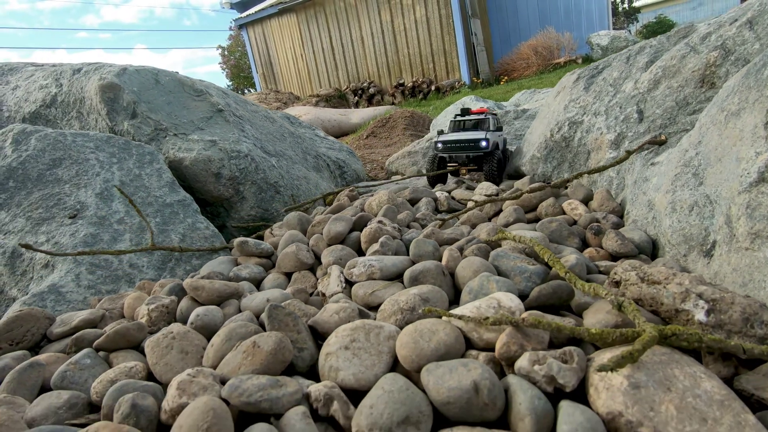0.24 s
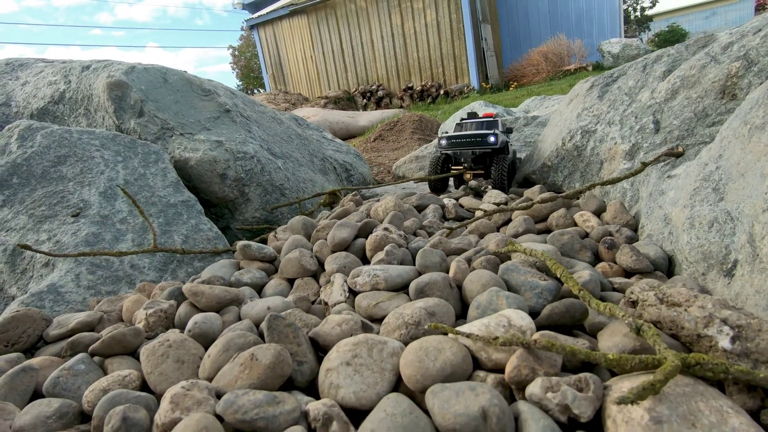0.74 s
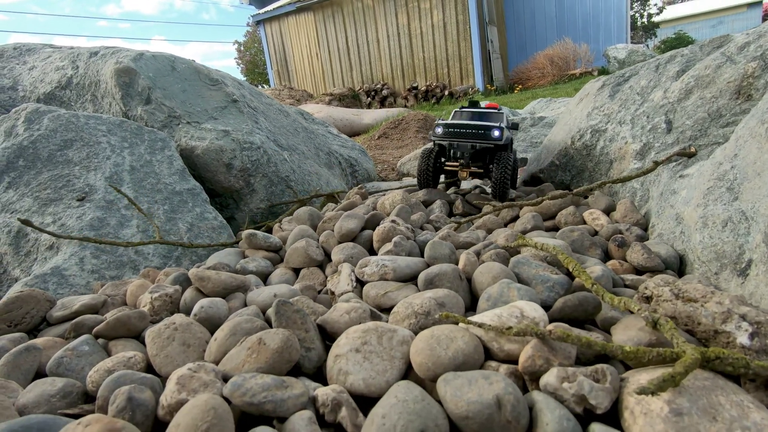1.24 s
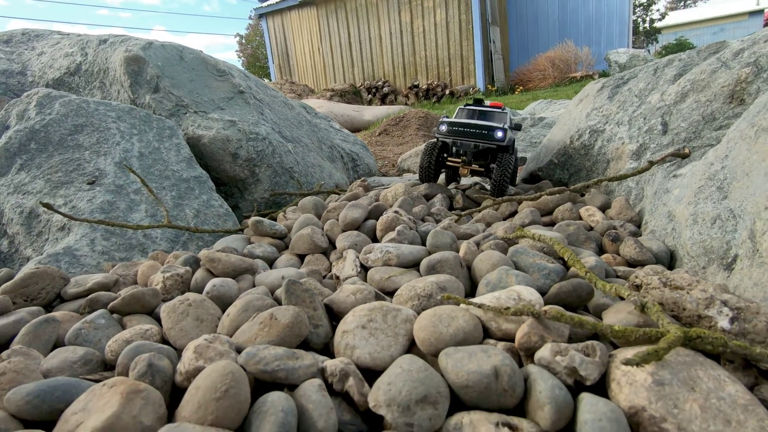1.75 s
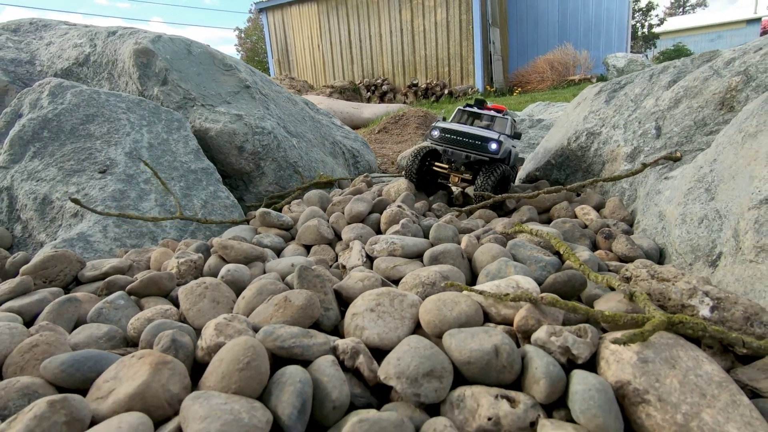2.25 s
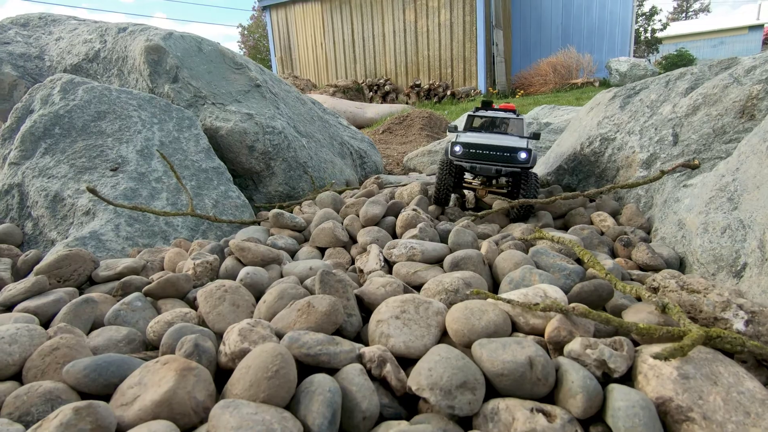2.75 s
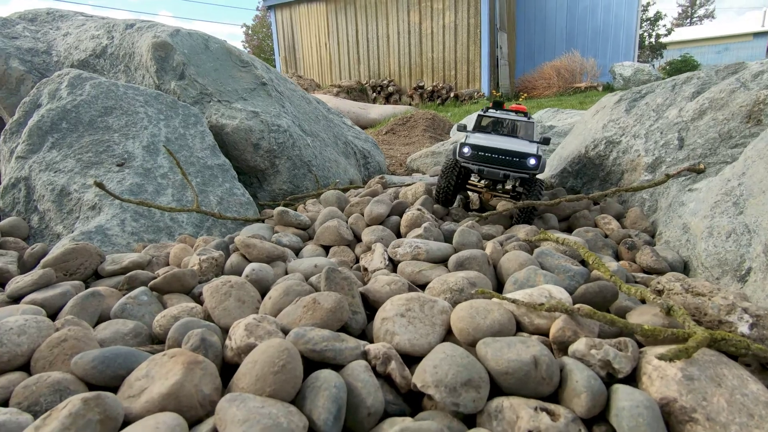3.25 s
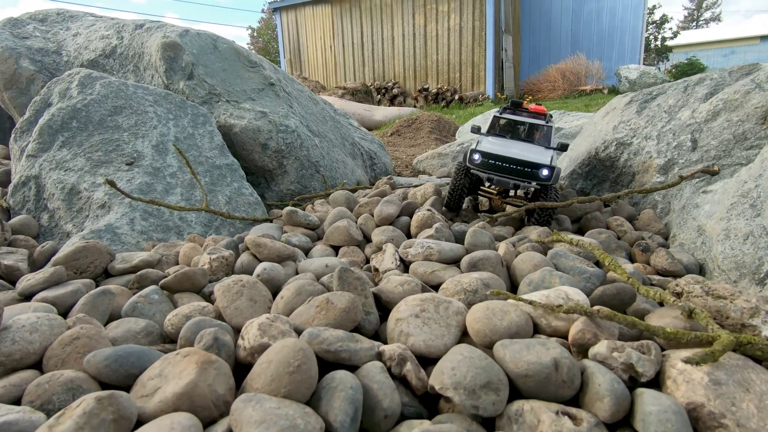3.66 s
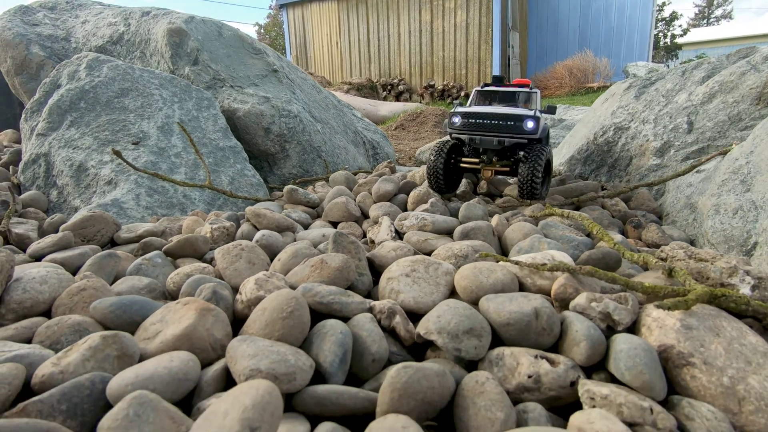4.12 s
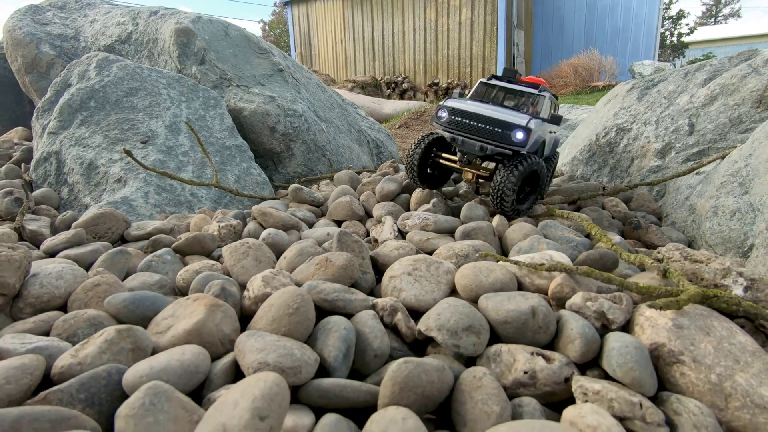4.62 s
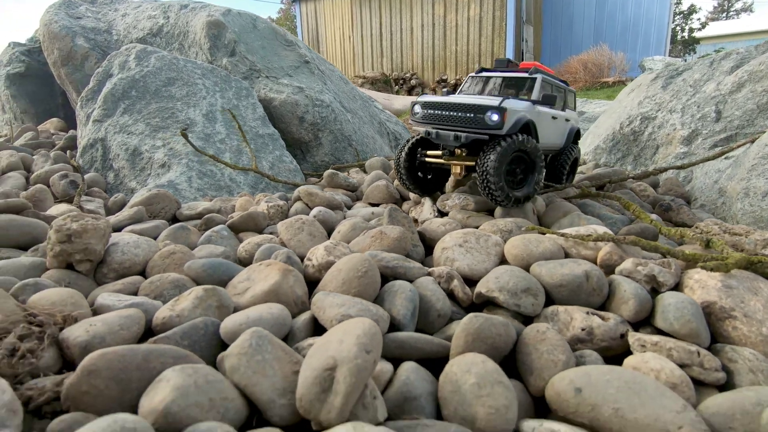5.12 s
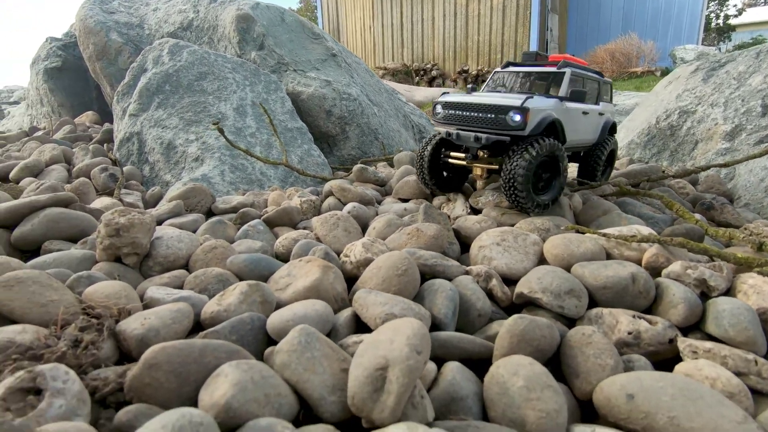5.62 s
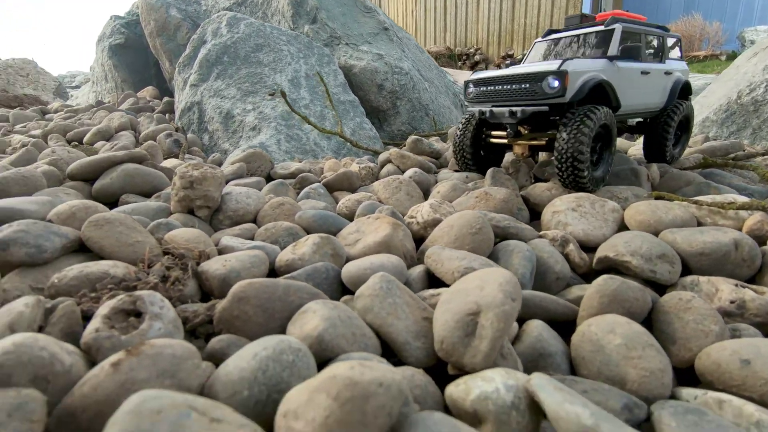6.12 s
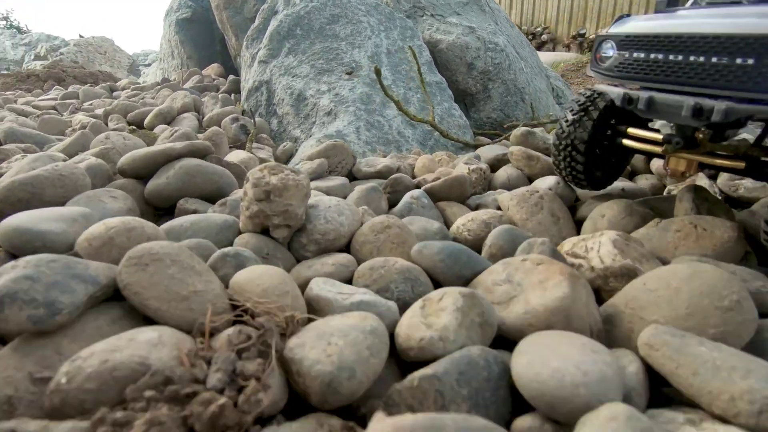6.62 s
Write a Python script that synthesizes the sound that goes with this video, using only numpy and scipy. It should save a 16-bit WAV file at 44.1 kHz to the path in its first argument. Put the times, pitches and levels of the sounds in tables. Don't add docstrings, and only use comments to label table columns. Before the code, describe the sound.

A thin, buzzy motor whir rises and falls with gaps between pulls, over gritty cracks and stony ticks. Wind flutters low across a small stereo microphone near the ground. A dense cluster of hollow case knocks, pebble clacks, dull thuds and faint steering chirps fills the middle. Afterwards the stereo image narrows and the little vehicle revs, pauses and creeps past over the stones.

```python
import sys
import numpy as np
from scipy import signal
from scipy.fft import rfft, irfft
from scipy.io import wavfile
from scipy.ndimage import uniform_filter1d

SR = 44100
rng = np.random.default_rng(int(sys.argv[2]) if len(sys.argv) > 2 else 0)


def generate_wav(sig):
    pcm = np.round(np.clip(np.atleast_2d(sig).T, -1, 1) * 32767).astype(np.int16)
    wavfile.write(sys.argv[1], SR, pcm)


def attenuation_scalar(level_db):
    decades = np.asarray(level_db, float) / 20
    return 10 ** decades


N = 303760


def rms_one(x):
    return x / np.sqrt(np.mean(x ** 2) + 1e-20)


def in_time(rows):
    s, *columns = np.transpose(rows)
    return [np.interp(np.arange(N) / SR, s, c) for c in columns]


def gate(start, end, fade_s):
    return np.interp(np.arange(N) / SR, [start - fade_s, start, end, end + fade_s], [0, 1, 1, 0])


def drift(rate_hz):
    r = np.exp(-32 * np.pi * rate_hz / SR)
    slow = signal.lfilter([1], [1, -2 * r, r * r], rng.standard_normal(N // 16 + 1002))[1000:]
    return np.interp(np.arange(N) / 16, np.arange(len(slow)), rms_one(slow))


def band(x, low_hz, high_hz):
    return signal.sosfilt(signal.butter(2, [low_hz, high_hz], "band", fs=SR, output="sos"), x)


def ring(clicks, hz, t60):
    r, w = attenuation_scalar(-60 / (t60 * SR)), 2 * np.pi * hz / SR
    return signal.lfilter([0, np.sin(w)], [1, -2 * r * np.cos(w), r * r], clicks)


def coloured(x, spectrum):
    hz, db = np.transpose(spectrum)
    bin_hz = np.arange(N // 2 + 1) * SR / N
    gain_db = np.interp(np.log(bin_hz + 1), np.log(hz), db)
    return rms_one(irfft(rfft(x) * attenuation_scalar(gain_db), N))


def patchy(x, edges_hz, own_db):
    return sum(attenuation_scalar(own_db * drift(30)) * band(x, low, high) for low, high in zip(edges_hz, edges_hz[1:]))


def grains(per_s, spread_db):
    level = attenuation_scalar(spread_db * np.minimum(rng.exponential(1, N), 4))
    return (rng.random(N) < per_s / SR) * level * rng.choice([-1, 1], N)


def add(out, s, sound):
    i = round(s * SR)
    out[..., i:i + sound.shape[-1]] += sound[..., :N - i]


def shell(x):
    # f/Hz, width/Hz, level/dB
    body_modes = [(900, 350, 4), (1700, 480, 1), (2426, 444, 10), (3400, 360, 4), (4590, 93, -2),
                  (5620, 150, -6.5), (6500, 82, -7), (7100, 900, -12), (10070, 190, -26)]
    out = 0
    for k, (hz, width, db) in enumerate(body_modes):
        r = np.exp(-np.pi * width / SR)
        zeros = np.array([1, 0, -1]) * (1 - r * r) / 2
        poles = [1, -2 * r * np.cos(2 * np.pi * hz / SR), r * r]
        out = out + (-1) ** k * attenuation_scalar(db) * signal.lfilter(zeros, poles, x)
    return out


def air():
    # peak t/s, level/dB, half length/s
    gust_peaks = [(0.122, -44, 0.32), (0.587, -44, 0.14), (1.022, -37.5, 0.13), (2.128, -36.5, 0.092),
                  (2.307, -36, 0.17), (2.844, -31, 0.11), (3.042, -36, 0.2), (3.387, -40.5, 0.24),
                  (3.811, -51.5, 0.23), (4.3, -51, 0.17), (4.776, -47, 0.19), (5.015, -41, 0.092),
                  (5.215, -33.5, 0.17), (5.819, -52.5, 0.31), (6.351, -60, 0.3)]
    # f/Hz, level/dB per Hz
    wind_colour = [(12, -24), (20, 1.5), (48, 0), (70, 4.5), (189, -15), (285, -27), (400, -22.5),
                   (520, -75)]
    # t/s, level/dB
    rumble_curve = [(0, -48), (0.6, -56), (1.05, -46), (1.55, -55), (2.8, -46.5), (3.3, -37), (3.7, -39.5),
                    (3.86, -47.5), (3.98, -40.5), (4.4, -46.5), (5.25, -43), (5.8, -43.5), (6.25, -43),
                    (6.44, -40), (6.89, -48)]
    # f/Hz, level/dB per Hz
    far_colour = [(150, -36), (250, -15.5), (722, 11.5), (1240, 3.5), (1730, -3), (2310, -24), (5930, -29),
                  (14000, -130)]
    # t/s, level/dB
    far_curve = [(0.0, -50), (0.4, -53.5), (3.65, -50.5), (3.7, -55.5), (6.31, -46.5), (6.89, -50)]
    calm_db = -51.5
    t = np.arange(N) / SR
    (rumble_db,), (far_db,) = in_time(rumble_curve), in_time(far_curve)

    gusts = attenuation_scalar(calm_db)
    for s, db, half_s in gust_peaks:
        gusts = gusts + attenuation_scalar(db) * np.clip(1 - np.abs(t - s) / half_s, 0, 1) ** 0.8
    wind = np.array([coloured(rng.standard_normal(N), wind_colour) * attenuation_scalar(2.0 * drift(14)) for row in range(2)])
    wind[1] += .3 * wind[0]
    wind = gusts * wind * attenuation_scalar([[0], [3]])

    rumble = band(band(rng.standard_normal(N), 130.0, 217.7), 69.0, 434)
    rumble = rms_one(rumble) * attenuation_scalar(2.5 * drift(7.8))
    rumble += attenuation_scalar(-7.5) * rms_one(band(grains(1500, spread_db=1.0), 210, 656))
    ground = attenuation_scalar(rumble_db - 4.0) * np.array([rumble, 0.28 * np.roll(rumble, SR)])

    far = np.array([coloured(rng.standard_normal(N), far_colour) for row in range(2)])
    return wind + ground + attenuation_scalar(far_db - 4.5) * far * attenuation_scalar([[0], [-.1]])


def throttle():
    # t/s, f/Hz
    mesh_far = [
        [(-0.1, 1140), (0.0, 1200), (0.06, 1290), (0.1, 1350), (0.13, 1547), (0.17, 1676), (0.23, 1570)],
        [(0.25, 1378), (0.33, 1210)],
        [(0.5, 846), (0.525, 1093), (0.55, 1265), (0.6, 1504), (0.65, 1758), (0.69, 1940), (0.72, 1654),
         (0.77, 1452), (0.785, 1238)],
        [(0.79, 1207), (0.805, 1090), (0.83, 1080), (0.88, 1118), (0.93, 1084), (0.97, 1176), (1.01, 1276)],
        [(1.035, 1590), (1.07, 1574), (1.11, 1800), (1.15, 1700), (1.18, 1595), (1.23, 1714), (1.29, 1660),
         (1.325, 1146), (1.36, 1222)],
        [(1.85, 839), (1.92, 900), (1.97, 1062), (2.01, 1122), (2.05, 1298), (2.12, 1241), (2.2, 1055)],
        [(2.36, 817), (2.5, 826), (2.55, 1058), (2.59, 768), (2.64, 795)],
        [(2.67, 845), (3.2, 817)],
        [(3.25, 840), (3.8, 814)],
    ]
    # t/s, f/Hz
    mesh_near = [
        [(3.95, 1053), (3.97, 1383), (3.99, 1700), (4.02, 1750), (4.07, 2090), (4.15, 1350), (4.18, 1000),
         (4.22, 835)],
        [(4.26, 674), (4.38, 700), (4.42, 895), (4.46, 870), (4.5, 810), (4.55, 825), (4.61, 883)],
        [(4.64, 1012), (4.72, 1381), (4.82, 1644), (4.85, 1540), (4.89, 1045)],
        [(4.92, 955), (4.95, 1080), (5.02, 1040), (5.06, 830), (5.12, 800), (5.2, 670)],
        [(5.27, 598.4), (5.56, 600)],
        [(5.64, 800), (5.7, 1000), (5.74, 1160), (5.81, 1240), (5.85, 1080), (5.9, 885)],
        [(6.17, 900), (6.22, 1355), (6.25, 1370), (6.28, 1750), (6.33, 1680), (6.36, 1420), (6.39, 1450),
         (6.41, 1648), (6.46, 1180), (6.5, 1054)],
        [(6.55, 800), (6.95, 820)],
    ]
    # whine level/dB, rasp level/dB, fizz level/dB, scrub level/dB
    loads = [(-56.5, -42, -47, -43.5), (-70, -46.5, -53.5, -49), (-63, -57, -60.5, -47),
             (-51.5, -50, -55, -51), (-57.5, -47.5, -57, -47), (-57.5, -51.5, -52, -45.5),
             (-53, -47, -54, -72), (-70, -49.5, -50.5, -53), (-86, -51, -65, -52), (-54, -50, -68.5, -48),
             (-50, -47, -76, -51), (-57.5, -46, -63, -47), (-55, -46.5, -62, -46), (-90, -87, -90, -51.5),
             (-57.5, -46.5, -60, -45), (-53, -50.5, -61.5, -44.5), (-89, -71, -60.5, -45.5)]
    rest_db = (-100, -73.5, -75, -63)
    db_per_octave = (8.6, 1.8, 13.6, 4.8)
    cruise_hz, spin_up_s, spin_down_s = 1200, 0.054, 0.058
    slide_s = .1

    surges = mesh_far + mesh_near
    hz, = in_time([row for rows in surges for row in rows])
    t = np.arange(N) / SR
    gains = attenuation_scalar(np.array(rest_db))[:, None] * np.ones(N)
    for rows, load_db in zip(surges, loads):
        start, end = rows[0][0], rows[-1][0]
        on = slice(max(round((start - spin_up_s) * SR), 0), round((end + spin_down_s) * SR))
        corners = [start - spin_up_s, start + spin_up_s, end - spin_down_s, end + spin_down_s]
        shape = np.interp(t[on], corners, [0, 1, 1, 0])
        speed_db = np.outer(db_per_octave, np.log2(hz[on] / cruise_hz))
        gains[:, on] += shape * attenuation_scalar(np.array(load_db)[:, None] + speed_db)
    gains[3] = uniform_filter1d(gains[3], round(slide_s * SR))
    return hz, gains


def whine(hz, gain, fizz_gain):
    # multiple of mesh, level/dB
    harmonics = [(1, 2.5), (2, 5), (3, 2.5), (4, -6), (5, -8), (6, -9), (7, -11), (8, -13)]
    teeth, throb = 12.5, .6
    jitter, wander, rough = .011, .008, .42
    flutter_db, sing_db = 2.0, -6
    phase = 2 * np.pi * np.cumsum(hz * (1 + jitter * drift(72.0) + wander * drift(18.45))) / SR
    worn = (1 + rough * drift(170)) * attenuation_scalar(flutter_db * drift(25))
    tones = [np.roll(worn, 7001 * k) * np.sin(k * phase) for k, db in harmonics]
    mix = sum(attenuation_scalar(db) * tone for (k, db), tone in zip(harmonics, tones))
    bare = gain * mix * (1 + throb * np.sin(phase / teeth))
    upper = band(band(sum(tones[2:6]), 4000, 7500), 3600, 10000)
    sing = attenuation_scalar(sing_db) * np.sqrt(gain * fizz_gain) * upper
    direct = attenuation_scalar(-3.5) * band(band(bare, 3000, 4600), 2800, 5600)
    return band(shell(bare), 1050, 12000) + direct + sing


def rasp_and_fizz(rasp_gain, fizz_gain):
    # f/Hz, level/dB per Hz
    fizz_colour = [(2650, -41), (4500, -40), (6040, -2), (7100, 10), (9190, 2), (9930, -0.5),
                   (13500, -14.5), (15500, -32)]
    bumps = attenuation_scalar(1.5 * drift(28))
    teeth = rms_one(shell(grains(6000, spread_db=2.5)))
    rasp = patchy(teeth, [600, 1400, 2100, 2900, 4000, 6000, 11000], own_db=1.5)
    brushes = coloured(grains(5000, spread_db=3.5), fizz_colour)
    fizz = patchy(brushes, [3060, 5430, 7100, 9000, 11500, 14300], own_db=2.0)
    return bumps * attenuation_scalar(2.0) * (rasp_gain * rasp + fizz_gain * fizz)


def tyre_scrub(gain):
    lugs = attenuation_scalar(2.5 * drift(30))
    rub = rms_one(band(band(grains(3000, spread_db=1.0), 1900, 4600), 1800, 9700))
    return attenuation_scalar(-9.0) * gain * lugs * rub


def clacks():
    # t/s, peak level/dB, f/Hz
    clack_events = [(0.059, -38, 2170), (0.094, -29.5, 960), (0.151, -29.5, 836), (0.249, -34, 880),
                    (2.089, -52, 1240), (2.717, -29, 664), (2.893, -32, 904), (2.915, -33, 697),
                    (3.005, -31, 1410), (3.029, -37, 1280), (3.102, -31, 514), (3.209, -44, 740),
                    (3.344, -31, 581), (3.384, -19, 640), (3.398, -23, 1350), (3.406, -31, 1260),
                    (3.439, -28, 670), (3.475, -21.5, 640), (3.499, -43, 729), (3.554, -31, 690),
                    (3.618, -36, 640), (3.664, -33, 586), (3.7, -36, 636), (3.719, -36, 501),
                    (3.778, -36, 1330), (3.799, -55, 730), (3.919, -47, 609), (4.455, -32.5, 864),
                    (5.807, -32, 654), (5.835, -26, 660), (6.04, -37, 715), (6.414, -38, 1497),
                    (6.441, -30, 665), (6.481, -40, 684)]
    out, t = np.zeros(N), np.arange(SR // 20) / SR
    for s, db, hz in clack_events:
        scuff = rng.standard_normal(len(t)) * attenuation_scalar(-60 * t / 0.043) * np.minimum(t / 0.0013, 1)
        dull = band(scuff, hz * 0.6, hz * 1.4) * 2.0
        add(out, s, attenuation_scalar(db - 5.5) * (dull + 0.21 * ring(scuff, hz, 0.0084)))
    return out


def grit():
    # t/s, peak level/dB, f/Hz
    grit_events = [(0.133, -20, 3080), (0.3617, -35, 2500), (0.401, -37, 3310), (0.854, -46, 7880),
                   (0.88, -38, 8000), (0.942, -37, 7970), (0.4319, -40, 3564), (1.3897, -32, 2720),
                   (1.4219, -35, 2670), (1.4506, -35, 2760), (1.491, -43.5, 7900), (1.509, -42, 2780),
                   (1.54, -41.5, 5960), (1.5838, -49, 7200), (1.6037, -33.5, 5950), (1.6306, -39, 2810),
                   (1.6521, -41, 4760), (1.6707, -41, 4000), (1.7234, -53, 3710), (1.7459, -45.5, 7720),
                   (1.7855, -38, 2540), (1.833, -43, 2494), (1.899, -43, 2560), (2.079, -39, 2560),
                   (2.134, -29, 2510), (2.2387, -26, 2680), (4.2141, -27, 2580), (4.263, -23, 2580),
                   (4.372, -38, 2606), (4.6502, -31, 4435), (4.958, -23.5, 3187), (5.2727, -59, 3617),
                   (5.297, -51, 3320), (5.3846, -41, 3180), (5.826, -20, 2760), (5.876, -26, 2730),
                   (5.9412, -56, 2760), (5.9654, -52, 3250), (6.012, -41, 3680), (6.038, -35.5, 2838),
                   (6.387, -31, 3284), (6.856, -22, 4170),
                   (0.6644, -35, 3780), (0.6968, -28, 3540), (0.7511, -23, 3000), (0.8545, -43, 2190),
             (0.8679, -29, 2220), (0.9434, -29, 2300), (1.111, -23.5, 2450), (1.2491, -32, 3400),
             (2.6754, -20, 2354), (2.8992, -29.5, 7460), (3.114, -34, 6960), (3.4844, -27, 2300),
             (3.702, -38, 2290), (3.743, -41, 6890), (3.801, -32, 2820), (3.8246, -31.5, 3240),
             (4.3725, -36, 2587), (5.1993, -44, 2390), (5.7791, -31, 2327), (6.0241, -40, 2040),
             (6.5008, -35, 2430), (6.5214, -31, 2020)]
    out, t = np.zeros(N), np.arange(SR // 20) / SR
    for s, db, hz in grit_events:
        snap = rng.standard_normal(len(t)) * attenuation_scalar(-60 * t / 0.024)
        add(out, s, attenuation_scalar(db - 4.0) * band(snap, hz * 0.64, hz * 1.25))
    return out


def ticks():
    # t/s, peak level/dB, relative brightness level/dB
    tick_events = [(0.17, -31.5, -11), (0.324, -37, 1), (0.968, -27.5, 13), (1.0141, -30, 3),
                   (1.1488, -38.5, 17.5), (1.2476, -35, -22), (1.516, -42, -30), (1.603, -50, -33),
                   (2.093, -37, -15), (2.254, -34.5, -32), (2.991, -31.5, -18), (3.619, -55, -22),
                   (3.717, -33.5, -42), (3.9407, -36, -27), (3.962, -27.5, -27), (4.2442, -35.5, -24),
                   (4.692, -36, -21), (4.9886, -29.5, -11), (5.021, -32, -6), (5.554, -30.5, -6),
                   (5.593, -39.5, -27), (5.8378, -29, -28), (5.974, -49, -27), (6.3876, -25, -20),
                   (6.4407, -33, 3.5), (6.5168, -46, -22), (6.56, -38, -16), (6.654, -36.5, -35),
                   (5.231, -41, -40)]
    # low f/Hz, high f/Hz
    pebble_hz = (2320, 3980)
    out, t = np.zeros(N), np.arange(SR // 20) / SR
    for s, db, bright_db in tick_events:
        hz = rng.uniform(*pebble_hz)
        decay = 0.6 * attenuation_scalar(-60 * t / 0.074) + 1.2 * attenuation_scalar(-60 * t / 0.014)
        touch = rng.standard_normal(len(t)) * decay * np.minimum(t / 0.00058, 1)
        body = .5 * band(band(touch, 900, 5500), 700, 7000)
        body += .09 * ring(touch, hz, .008) + .04 * ring(touch, hz * rng.uniform(.55, .8), .012)
        edge = 0.27 * attenuation_scalar(bright_db) * band(touch, 5600, 10100)
        add(out, s, attenuation_scalar(db - 2.5) * (body + edge))
    return out


def knocks():
    # t/s, peak level/dB, case note f/Hz, relative crack level/dB, relative hollow level/dB
    knock_events = [(0.2197, -26.5, 1450, -15, -6), (2.4124, -34.5, 1301, -37, 9),
                    (2.601, -34, 1253, -34, 5), (2.656, -22, 1372, -15, -9), (2.691, -30, 1377, -6.5, 2.5),
                    (2.8432, -21.5, 1282, -8.5, -14.5), (2.8938, -48, 1210, -6, 7),
                    (2.9988, -23.5, 1384, -3.5, -8.5), (3.0314, -45, 1230, -20, -12),
                    (3.075, -36.5, 1305, -30, -13), (3.1303, -24, 1250, -6, -12.5),
                    (3.184, -22, 1376, -38, -0.5), (3.2307, -36, 1156, -14, 0),
                    (3.274, -23.5, 1415, -7, -10.5), (3.3235, -24.5, 1240, -19, -6),
                    (3.3934, -19.5, 1450, -21, 4.5), (3.409, -48, 1130, -24, 5),
                    (3.423, -28, 1270, -11, -11), (3.4633, -20.5, 1320, -33, -3.5),
                    (3.536, -30.5, 1163, -26, -8.5), (3.584, -22, 1397, -10.5, -21),
                    (3.774, -31.5, 1376, -24, -6), (6.413, -31, 1330, -26, 6)]
    # f/Hz, t60/s, level/dB
    case_modes = [(1700, .008, -2), (2700, .006, -2), (3700, .006, -3), (4900, .005, -4), (7000, .007, -1)]
    opposed_db, damped_db_per_db = 14, 0.9
    lead_s, lead_db = 0.016, -12
    out, t = np.zeros((2, N)), np.arange(SR // 12) / SR
    for s, db, hz, crack_db, hollow_db in knock_events:
        decay = attenuation_scalar(-60 * t / 0.017) + 0.033 * attenuation_scalar(-60 * t / 0.051)
        contact = rng.standard_normal(len(t)) * decay * np.minimum(t / 0.0017, 1) / 2.07
        press = np.abs(contact) * t / 0.0016 * np.sin(2 * np.pi * hz * t)
        damped = min(attenuation_scalar(-damped_db_per_db * (hollow_db + 15)), 1)
        note = ring(press, hz, 0.012) / 9 + ring(contact, hz * rng.uniform(.85, 1.0), 0.04) / 13
        note = damped * note + ring(contact, hz * rng.uniform(1.1, 1.35), .008) / 12
        note += band(contact, 800, 2600) * 2.4
        modes = 0
        for f, t60, d in case_modes:
            modes = modes + attenuation_scalar(d + rng.normal(0, 3.2)) * ring(contact, f * rng.uniform(0.86, 1.06), t60)
        crack = attenuation_scalar(crack_db) * (band(band(contact, 600, 8000), 500, 9000) * 2.2 + .4 * modes)
        blow = band(-np.abs(contact) * np.exp(-t / 0.0015), 200, 3300)
        cavity = ring(blow, 690, 0.014) + 0.5 * ring(blow, 440, 0.018) + 0.4 * ring(blow, 950, 0.01)
        hollow = attenuation_scalar(hollow_db) * (cavity + 8 * blow) / 2.5
        flesh = attenuation_scalar(hollow_db / 2) * 1.2 * band(contact, 500, 4200)
        add(out[0], s, attenuation_scalar(db) * (note + crack + hollow + flesh))
        lead = round(lead_s * SR)
        scuff = np.linspace(0, 1, lead) * band(rng.standard_normal(lead), 1500, 3400)
        add(out[0], s - lead_s, attenuation_scalar(db + lead_db) * scuff)
        opposed = np.roll(note, 8) - attenuation_scalar(-11.0) * crack + attenuation_scalar(4.5) * np.roll(hollow, 40)
        add(out[1], s, attenuation_scalar(db + opposed_db) * opposed)
    return out


def controller_tone():
    # start t/s, end t/s, level/dB
    holds = [
        (0.401, 1.002, -79),
        (1.003, 1.384, -67),
        (1.717, 2.594, -71.5),
        (2.598, 2.7, -61),
        (2.73, 2.77, -56),
        (4.046, 5.942, -76),
        (6.168, 6.446, -72),
    ]
    waver = .5 * drift(6)
    held = sum(attenuation_scalar(db) * gate(start, end, 0.055) for start, end, db in holds)
    return held * attenuation_scalar(12.0 * waver) * np.sin(2 * np.pi * 8000 * np.arange(N) / SR + waver)


def scrapes():
    # start t/s, end t/s, f/Hz, level/dB
    drags = [(1.676, 1.727, 3900, -63.5), (2.271, 2.324, 3720, -60), (3.188, 3.226, 2770, -45),
             (3.363, 3.405, 3400, -49), (3.481, 3.54, 2570, -45.5), (3.634, 3.684, 4550, -52),
             (3.835, 3.884, 3310, -59), (5.31, 5.425, 3530, -59), (5.951, 5.988, 3360, -57.5),
             (6.07, 6.194, 4180, -58.5), (6.337, 6.396, 4370, -49.5)]
    out, size = np.zeros(N), SR // 8
    for start, end, hz, db in drags:
        catches_db = 4 * rng.standard_normal(size // 100 + 1).repeat(100)[:size]
        rub = rng.standard_normal(size) * attenuation_scalar(catches_db)
        rub = rms_one(band(band(rub, hz * 0.855, hz * 1.01), hz * 1.16, hz * 1.2))
        length = round((end - start) * SR)
        add(out, start, attenuation_scalar(db) * np.hanning(length) ** .5 * rub[:length])
    return out


def servo():
    # start t/s, end t/s, level/dB
    twitches = [(2.656, 2.769, -43.5), (2.875, 2.971, -53.5), (3.057, 3.111, -46), (3.174, 3.233, -55.5),
                (3.284, 3.293, -77), (3.308, 3.38, -52), (3.458, 3.52, -55), (3.62, 3.678, -51),
                (3.76, 3.756, -52), (3.816, 3.84, -61.5), (5.372, 5.393, -64), (5.419, 5.443, -55),
                (5.473, 5.494, -47), (5.525, 5.55, -55), (5.731, 5.753, -52), (5.782, 5.836, -48),
                (6.116, 6.129, -70)]
    # f/Hz, level/dB per Hz
    buzz_colour = [(2350, -56), (4000, -16), (6370, 2), (8030, 5), (9360, -14), (10500, 0.5), (12500, -9),
                   (15500, -23)]
    running = sum(attenuation_scalar(db) * gate(start, end, 0.008) for start, end, db in twitches)
    buzz = coloured(grains(7400, spread_db=0.5), buzz_colour)
    return running * attenuation_scalar(2.0 * drift(29)) * patchy(buzz, [3000, 6500, 9000, 11100, 15500], own_db=3.5)


def thuds():
    # t/s, peak level/dB, f/Hz, t60/s
    drops = [(2.844, -25, 172, 0.1), (3.006, -19.5, 207, 0.035), (3.235, -22, 145, 0.045),
             (3.404, -15, 150, 0.069), (3.469, -23.5, 142, 0.11), (3.643, -28.5, 183, 0.12),
             (3.761, -30.5, 182, 0.075), (3.953, -21, 159.3, 0.35), (4.248, -35.5, 185.8, 0.12),
             (5.549, -27.5, 200.6, 0.48), (5.838, -32.5, 233.5, 0.23), (6.438, -28.5, 133, 0.11),
             (6.624, -21.5, 230, 0.061)]
    out, t = np.zeros(N), np.arange(SR // 4) / SR
    for s, db, hz, t60 in drops:
        push = band(rng.random(len(t)) * np.exp(-t / 0.018), 93, 590)
        modes = ring(push, hz, t60) + 2.2 * ring(push, hz * 1.28, t60 * 0.2)
        add(out, s, attenuation_scalar(db + 8.5) * modes / 90)
    return out


def squeaks():
    # start t/s, end t/s, start f/Hz, end f/Hz, level/dB
    glides = [
        (3.075, 3.122, 5716, 7296, -57),
        (3.178, 3.206, 6600, 7500, -70),
        (3.311, 3.39, 7526, 6500, -56.5),
        (3.468, 3.52, 6500, 6500, -69),
    ]
    out = np.zeros(N)
    for start, end, start_hz, end_hz, db in glides:
        hz = np.linspace(start_hz, end_hz, round((end - start) * SR))
        phase = 2 * np.pi * np.cumsum(hz) / SR
        whistle = np.sin(phase) + 0.12 * np.sin(2 * phase)
        add(out, start, attenuation_scalar(db) * np.hanning(len(hz)) ** 0.5 * whistle)
    return out * attenuation_scalar(12.5 + 3.3 * drift(85))


def scene():
    # t/s, difference level/dB
    guard_curve = [(0, -7.5), (2.95, -4), (3.3, -13.5), (3.6, -21.5), (3.95, -40.5), (6.25, -46),
                   (6.42, -20.5), (6.89, -14)]
    guard_on_treble = 0.56
    guard_db, = in_time(guard_curve)
    hz, (whine_gain, rasp_gain, fizz_gain, scrub_gain) = throttle()
    truck = whine(hz, whine_gain, fizz_gain) + rasp_and_fizz(rasp_gain, fizz_gain) + tyre_scrub(scrub_gain)
    truck += clacks() + grit() + ticks() + controller_tone() + scrapes() + servo() + thuds() + squeaks()
    late = np.roll(truck, 9)
    rock_echo = np.roll(truck, 331)
    high_pass = signal.butter(4, 5600, "high", fs=SR, output="sos")
    treble = signal.sosfiltfilt(high_pass, truck + attenuation_scalar(4.0) * rock_echo)
    mid, side = air()
    side = attenuation_scalar(guard_db) * (side + band(band(late, 490, 2740), 200, 2940))
    side -= attenuation_scalar(guard_on_treble * guard_db - 2.5) * treble
    knock, opposed = knocks()
    mid = mid + truck + knock
    side = side + attenuation_scalar(guard_db) * opposed
    return np.array([mid + side, mid - side])


def top_cut(x):
    return signal.sosfilt(signal.butter(12, 15710, fs=SR, output="sos"), x)


def record(dry):
    low_pass = signal.cheby2(12, 60, 15900, fs=SR, output="sos")
    mix = signal.sosfilt(low_pass, dry)
    return top_cut(mix)


dry = scene()
out = record(dry)
generate_wav(out)
```